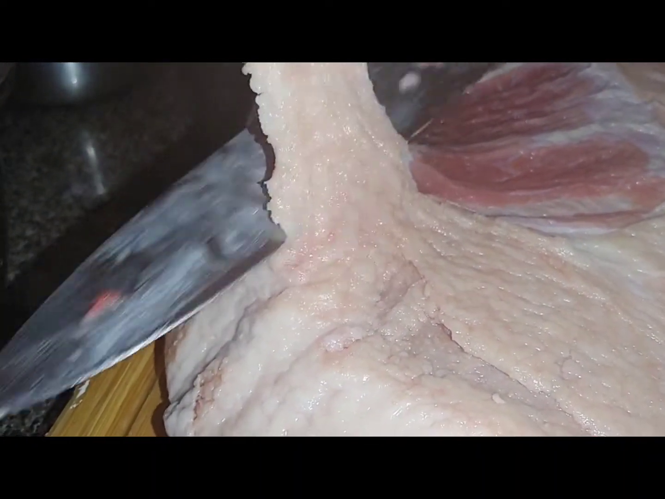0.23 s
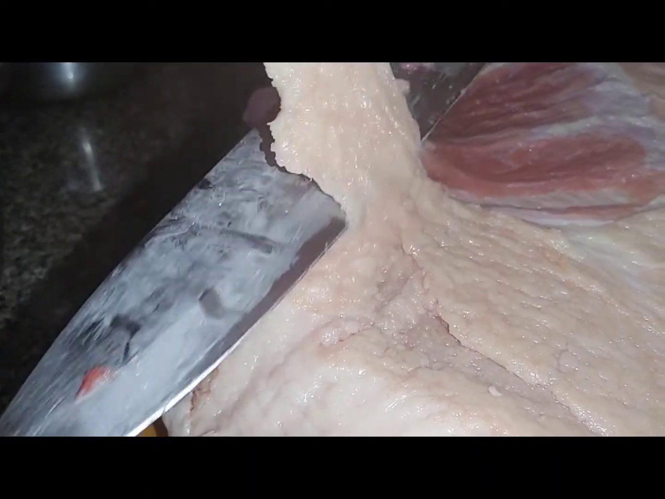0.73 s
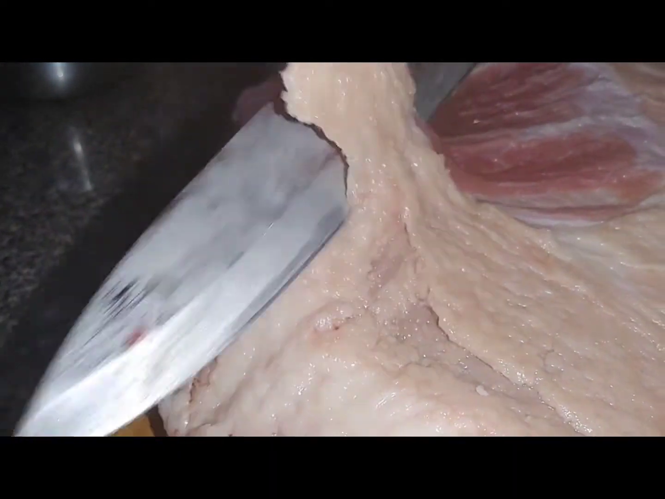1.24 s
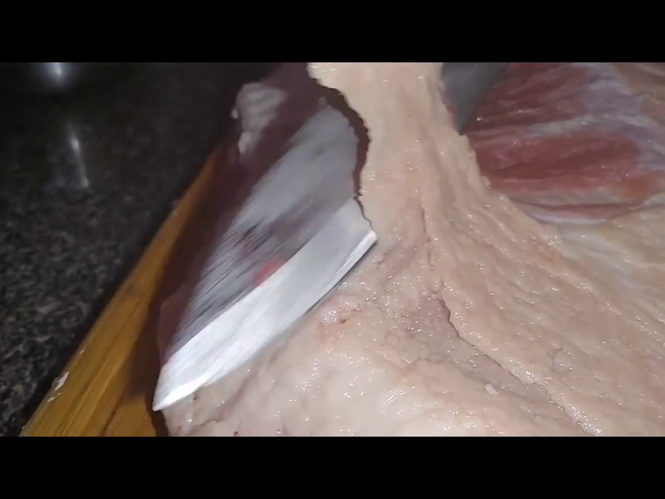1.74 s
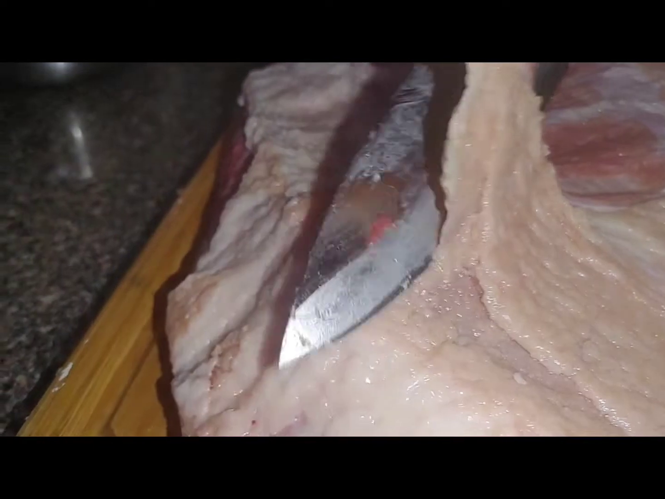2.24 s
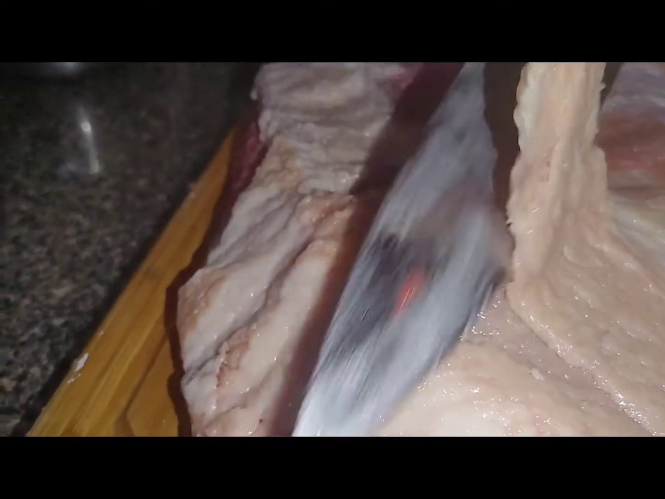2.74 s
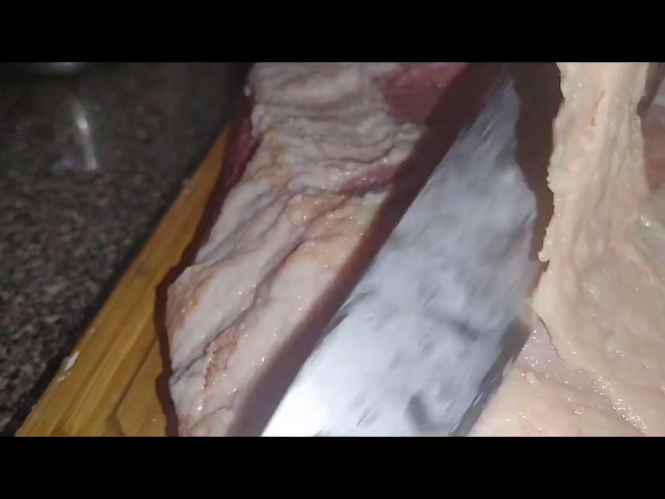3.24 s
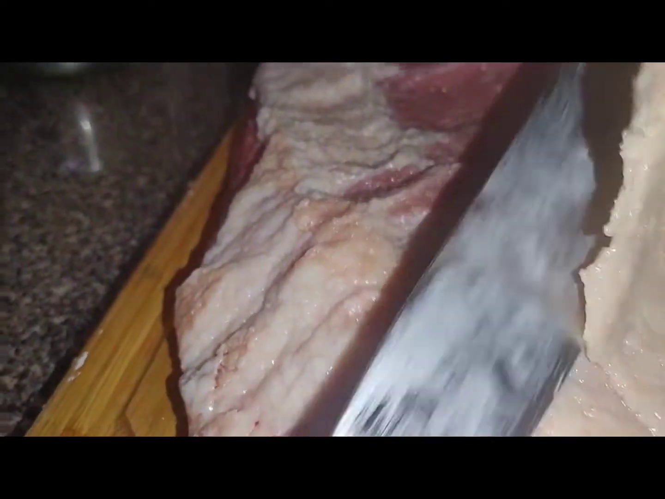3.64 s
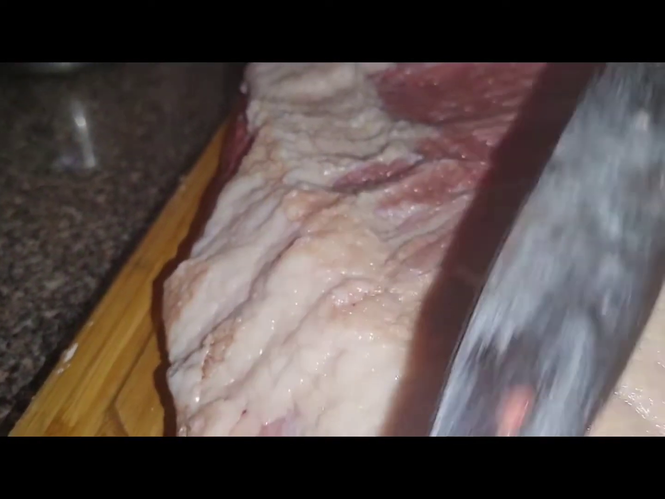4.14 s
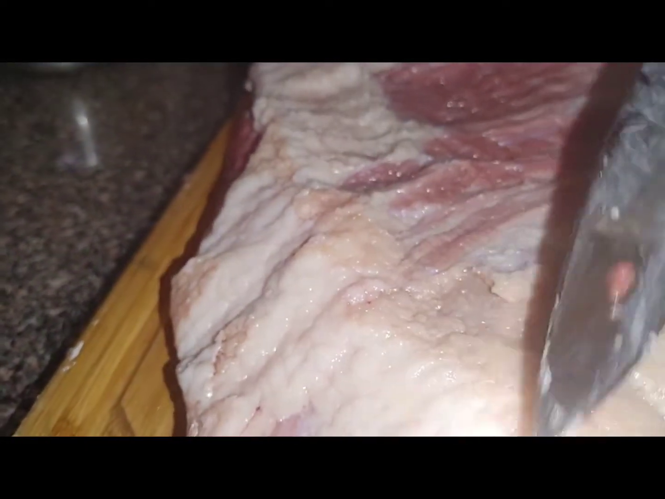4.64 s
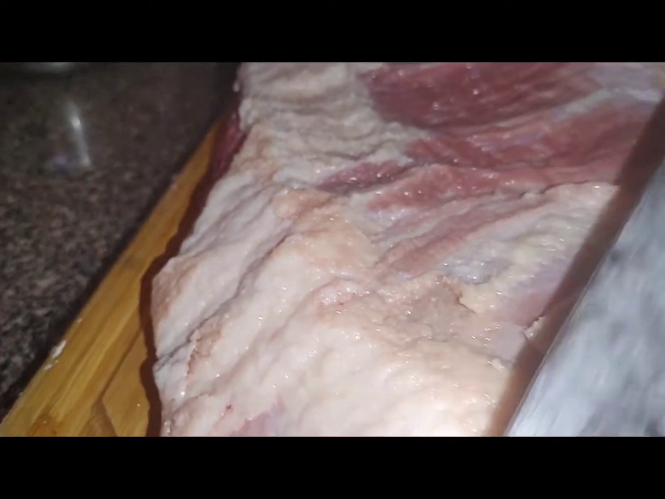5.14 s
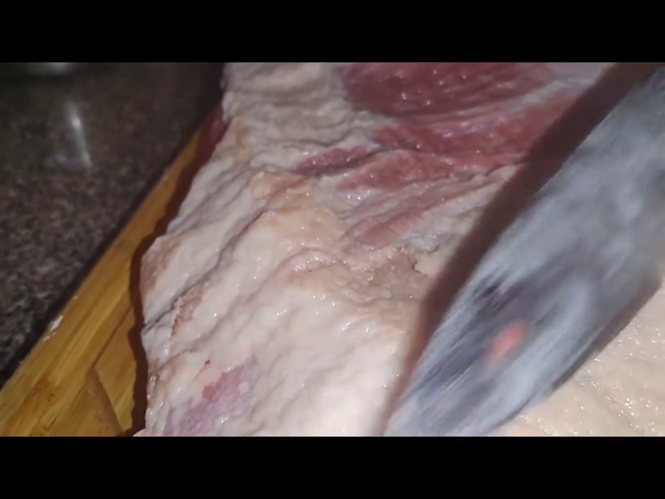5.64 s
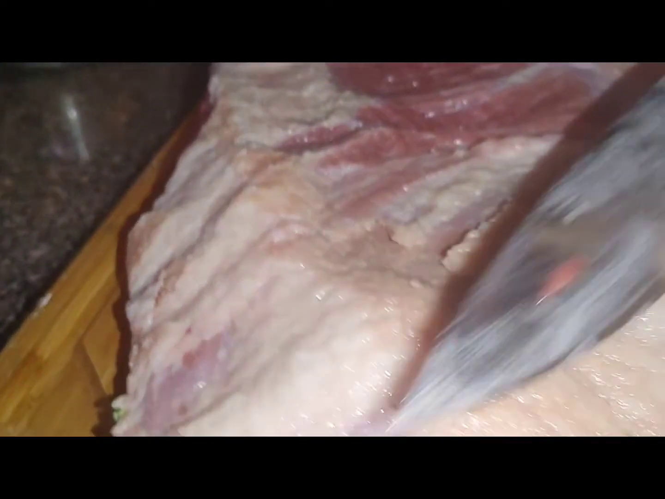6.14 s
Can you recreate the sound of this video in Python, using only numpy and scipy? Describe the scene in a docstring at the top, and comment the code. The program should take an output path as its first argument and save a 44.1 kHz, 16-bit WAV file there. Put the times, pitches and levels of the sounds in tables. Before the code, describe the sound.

A knife saws through raw fatty meat in quick hissing, rasping back-and-forth strokes, with small wet squelches and a low appliance hum behind.

```python
"""Hissing, rasping strokes, about five a second: a chef's knife saws the fat off raw meat on a wooden board.
Tearing fibres and dragging fat are snapping noise through the blade's damped modes, one burst per stroke.
Wet slips ring a pocket under the blade; a short knock and soft bumps are decaying sines of the board.
Behind, in the kitchen, an appliance hums in slightly wavering tones over shaped air noise."""
import sys
import numpy as np
from scipy import signal
from scipy.fft import rfft, irfft, next_fast_len
from scipy.io import wavfile

SR = 44100
rng = np.random.default_rng(int(sys.argv[2]) if len(sys.argv) > 2 else 0)


def unload_wav(signal):
    """Save mono or channel-first audio to the path in sys.argv[1] as 16-bit WAV at rate SR, clipped to [-1, 1]."""
    wavfile.write(
        sys.argv[1],
        SR,
        np.round(np.clip(np.atleast_2d(signal).T, -1, 1) * 32767).astype(np.int16),
    )


N = 281799


def from_db(db):
    """Amplitude ratio of a level in dB."""
    return 10 ** (np.asarray(db) / 20)


def rms_one(x):
    """Scale x to unit rms."""
    return x / np.sqrt(np.mean(x ** 2) + 1e-20)


def at_hz(points, hz, column=1):
    """One table column, interpolated on a log-frequency axis."""
    points = np.array(points)
    return np.interp(np.log(hz + 1e-9), np.log(points[:, 0]), points[:, column])


def filtered(x, response):
    """Pass x through a response given as a function of frequency."""
    size = next_fast_len(N + SR // 2)
    spectrum = rfft(x, size) * response(np.fft.rfftfreq(size, 1 / SR))
    return irfft(spectrum, size)[..., :N]


def resonance(f, hz, width_hz):
    """Damped resonance, gain 1 at its peak."""
    return 1j * f * width_hz / (hz ** 2 - f ** 2 + 1j * f * width_hz)


def drift(rate_hz):
    """Smooth random wander of unit rms: noise through two equal poles at rate_hz."""
    step = 40  # samples per point of the slow signal
    settle = 2000
    pole = np.exp(-2 * np.pi * rate_hz * step / SR)
    noise = rng.standard_normal(N // step + settle + 2)
    slow = signal.lfilter([1], [1, -2 * pole, pole * pole], noise)[settle:]
    return np.interp(np.arange(N) / step, np.arange(len(slow)), rms_one(slow))


def echoes(x, t60_s):
    """Dense decaying reflections, independent per side; each tail has unit energy."""
    t = np.arange(SR // 2) / SR
    tail = rng.standard_normal((2, len(t))) * from_db(-60 * t / t60_s)
    tail /= np.sqrt(np.sum(tail ** 2, axis=1, keepdims=True))
    return signal.fftconvolve(np.atleast_2d(x), tail, axes=1)[:, :N]


def appliance():
    """Slightly wavering motor tones over a soft rush of air, partly shared by the two sides."""
    # slightly wavering tones: (frequency [Hz], nominal rms level [dB])
    hum_tones = [(54, -81), (178, -79), (198.3, -61.5), (247.3, -70.5), (481, -83), (743, -85)]
    # air noise spectrum: (frequency [Hz], relative density [dB])
    air_spectrum = [(25, -40), (55, -19.5), (90, -16.5), (150, -17), (195, 5.5), (230, -1.5), (295, 2.5),
                    (345, -15), (460, -7), (560, -16), (1000, -19.5), (2000, -28), (6000, -35.5),
                    (15000, -50)]
    # left-right likeness of the air noise: (frequency [Hz], correlation [-1 to 1])
    air_likeness = [(50, 0), (130, 0), (290, 0.12), (640, 0), (1400, 0.005)]
    air_rms_db = -61

    def air(sign):
        def response(f):
            correlation = np.clip(at_hz(air_likeness, f), -1, 1)
            return from_db(at_hz(air_spectrum, f)) * np.sqrt(1 + sign * correlation)
        return filtered(rng.standard_normal(N), response)

    mid, side = air(+1), air(-1)
    out = from_db(air_rms_db) * rms_one(np.array([mid + side, mid - side]))
    t = np.arange(N) / SR
    side_phase_rad = np.array([[-.55], [.55]])  # standing waves reach the two sides out of step
    for hz, rms_db in hum_tones:
        level = np.sqrt(2) * from_db(rms_db + 2.1 * drift(rate_hz=3.9))
        phase_rad = 2 * np.pi * hz * t + 0.5 * drift(rate_hz=1.83) + side_phase_rad
        out += level * np.sin(phase_rad)
    return out


def strike(hits, hz, t60_s):
    """Each hit starts one exponentially decaying mode."""
    out = np.zeros(N)
    for start_s, db in hits:
        age_s = np.maximum(np.arange(N) / SR - start_s, 0)
        decay_db = np.minimum(60 * age_s / t60_s, 200)
        out += from_db(db - decay_db) * np.sin(2 * np.pi * hz * age_s)
    return out


def board():
    """A short woody knock on several modes, and dull one-mode bumps cushioned by the meat."""
    # hits of the knock: (time [s], level [dB])
    knock_hits = [(3.446, -54), (3.453, -72), (3.468, -60)]
    # board modes: (frequency [Hz], t60 [s], gain [dB])
    board_modes = [(770, .05, -6), (1080, 0.028, 1), (1166, 0.055, 2)]
    # soft bumps of the meat on the board: (time [s], level [dB])
    bump_hits = [(4.93, -50), (5.859, -54), (5.880, -49), (6.259, -53), (6.33, -55)]
    knock = sum(from_db(db) * strike(knock_hits, hz, t60_s) for hz, t60_s, db in board_modes)
    return knock + strike(bump_hits, hz=268, t60_s=0.16)


def fibres(per_s, spread_db, smooth_share, snap_s=0.0004):
    """Tiny uneven snaps over smooth drag: decaying noise bursts, independent noise per side."""
    snaps = rng.random(N) < per_s / SR
    sizes = from_db(spread_db * np.minimum(rng.exponential(1, N), 4)) * snaps
    energy = signal.lfilter([1], [1, -np.exp(-1 / (snap_s * SR))], sizes ** 2 + 1e-18)
    level = np.sqrt(energy / energy.mean() + smooth_share ** 2)
    return rms_one(level * rng.standard_normal((2, N)))


def squelches():
    """Wet fat slips on the steel: bursts of quick slips ring a pocket between blade and fat."""
    # slip bursts, Gaussian: (centre [s], sigma [s], relative level [dB])
    slip_bursts = [(0.786, 0.0077, -61), (0.812, 0.0087, -55), (4.81, 0.0029, -52.5), (5.005, 0.014, -52),
                   (5.369, 0.0099, -69), (5.728, 0.016, -48.5), (5.755, 0.008, -44.5), (5.806, 0.022, -63),
                   (5.88, 0.0015, -52), (6.103, 0.015, -57), (6.304, 0.0086, -43.5)]
    # pocket resonances: (frequency [Hz], width [Hz], relative gain [dB])
    pocket_modes = [(2336, 72, -0.5), (4400, 160, -0.5), (4220, 72, 7)]

    def pocket(f):
        return sum(from_db(db) * resonance(f, hz, width_hz) for hz, width_hz, db in pocket_modes)

    t = np.arange(N) / SR
    level = sum(from_db(db) * np.exp(-.5 * ((t - centre_s) / sigma_s) ** 2)
                for centre_s, sigma_s, db in slip_bursts)
    slips = fibres(per_s=3100, spread_db=0.0, smooth_share=0.98)
    side_gain = from_db([[-7], [2]])  # left, right
    return filtered(slips * level, pocket) / np.std(filtered(slips, pocket)) * side_gain


def knife_colour(f):
    """Broad friction colour with the blade's meat-damped resonances standing out of it."""
    # friction spectrum: (frequency [Hz], left gain [dB], right gain [dB])
    friction = [(300, -52, -22), (706, -27, -22), (1335, -15.5, -14.5), (1520, -27, -6.5),
                (1820, -19, -10.5), (2470, -26, -3.5), (3310, -5.5, -9.5), (4090, -7.5, 3.5),
                (5030, -1.5, -4), (6040, -11, -9.5), (6880, -7.5, -29), (9500, -10.5, -11),
                (11770, -1.5, -20), (12000, -5.5, -25), (13320, -15.5, -34), (15300, -23.5, -30)]
    # blade modes: (frequency [Hz], width [Hz], left lift [dB], right lift [dB])
    blade_modes = [(2350, 164, 13.5, 1), (2761, 66, 14.5, 4.5), (4890, 45, 2, 9), (6444, 170, 8, 8),
                   (7215, 57, 7.5, 16.5), (7525, 125, 8, 17.5), (8432, 240, 13, 15), (9384, 55, 13.5, 15.5),
                   (10310, 124, 11.5, 0), (11145, 173, 3, 17), (13000, 140, 0, 12), (14300, 170, 3, 4)]
    colour = from_db([at_hz(friction, f, column=1), at_hz(friction, f, column=2)])
    for hz, width_hz, left_db, right_db in blade_modes:
        colour = colour * (1 + (from_db([[left_db], [right_db]]) - 1) * resonance(f, hz, width_hz))
    return colour


def contact_colour(f, fine_db=5.5, sides_db=3.5, broad_db=2.5):
    """Where the meat grips the blade it damps some frequencies and frees others: random ripple."""
    fine_hz = np.arange(0, SR / 2, 110)
    broad_hz = np.geomspace(700, 16000, 10)
    ripple_db = fine_db * rng.standard_normal(len(fine_hz))
    ripple_db = ripple_db + sides_db * rng.standard_normal((2, len(fine_hz)))
    ripple_db += np.interp(fine_hz, broad_hz, broad_db * rng.standard_normal(len(broad_hz)))
    return from_db([np.interp(f, fine_hz, side_db) for side_db in ripple_db])


def balanced(f, shape, band_db, body_hz=900, body_db=-40):
    """Pressure and depth of cut set hiss, rasp and scrape; the meat's dull rubbing has a fixed gain."""
    # hiss, rasp and scrape bands: (low edge [Hz], high edge [Hz])
    band_edges = [(6000, 15500), (3000, 6000), (1100, 3000)]
    power = np.mean(np.abs(shape) ** 2, axis=0)
    natural_db = [10 * np.log10(np.mean(power * (f > low) * (f < high))) for low, high in band_edges]
    lift_db = np.subtract(band_db, natural_db)[::-1]  # lowest band first
    # flat gain inside each band, sloping between bands
    plateau_hz = np.sort(np.ravel(np.array(band_edges) * [1.12, 1 / 1.12]))
    gain_db = np.interp(f, [body_hz, *plateau_hz], [body_db, *np.repeat(lift_db, 2)])
    return shape * from_db(gain_db)


def stroke_level(age_s, start_s, length_s, swell_db):
    """The edge bites, speed follows a half sine while the hand bears down or eases, the edge lets go."""
    # the bite softens as the flap of fat comes loose
    attack_s = 0.035 + 0.0038 * start_s
    release_s = 0.044
    # friction is louder at full speed than at the turns, more so as the cut deepens
    speed_db = 10.5 + 1.14 * start_s
    travel = np.clip(age_s / length_s, 0, 1)
    attack = np.clip(age_s / attack_s, 0, 1) ** 2
    release = np.clip((length_s - age_s) / release_s, 0, 1) ** 2
    speed = np.sin(np.pi * travel)
    return attack * release * from_db(speed_db * (speed - 1) + swell_db * (travel - .5))


def stroke_bands(time_s, hiss_db, is_push):
    """Hiss, rasp and scrape levels at time_s; a push bears down harder than a pull and scrapes more."""
    # coarseness as the cut proceeds: (time [s], rasp re hiss [dB], pull scrape re hiss [dB])
    coarseness = [(0, -14, -18.5), (0.8, -14, -19.5), (1.2, -5.5, -14), (1.65, -9.5, -16.5),
                  (3.9, -10, -14.5), (4.35, -5.5, -16), (5.4, -7, -14), (5.65, -2, -9), (6.35, -7, -10)]
    push_scrape_db = 2.0
    times_s, *columns = np.transpose(coarseness)
    rasp_db, scrape_db = (np.interp(time_s, times_s, column) for column in columns)
    return hiss_db + np.array([0, rasp_db, scrape_db + push_scrape_db * is_push])


def slicing(spots=4):
    """Fibre noise driven by each stroke's speed; its grip flutters and shifts along the blade."""
    # pulls and pushes in turn: (start [s], end [s], relative hiss level [dB], start-to-end swell [dB])
    strokes = [(0, 0.191, -49.5, -14.5), (0.209, 0.429, -45.5, 4), (0.465, 0.648, -49.0, -5),
               (0.662, 0.887, -44.0, -2), (0.91, 1.082, -53, -2), (1.112, 1.291, -53, -1),
               (1.331, 1.525, -49.5, 7), (1.539, 1.747, -46, -3.5), (1.758, 1.969, -46, -9),
               (1.959, 2.166, -44, -2.5), (2.177, 2.384, -47.5, -15), (2.39, 2.592, -44, 5),
               (2.589, 2.801, -47.0, 0), (2.797, 3.006, -44, 1), (3.012, 3.219, -48.0, -9.5),
               (3.204, 3.414, -43.5, -7.5), (3.4, 3.625, -44.0, 1), (3.615, 3.832, -39.5, 1.5),
               (3.809, 4.022, -46.0, 6.5), (4.008, 4.242, -42.5, -10.5), (4.223, 4.431, -58.5, -36),
               (4.417, 4.596, -54.5, 1), (4.596, 4.785, -44.5, 11), (4.777, 4.982, -42.5, -2.5),
               (4.972, 5.154, -42.5, 2), (5.132, 5.355, -40.5, 2.5), (5.329, 5.526, -47.0, -6),
               (5.515, 5.718, -44.5, -5), (5.695, 5.882, -48.5, 2), (5.861, 6.072, -46, 1),
               (6.054, 6.237, -45.0, 16), (6.226, 6.421, -39, -3)]
    size, lead = 16384, 1024  # samples per stroke block, and ahead of its start
    f = np.fft.rfftfreq(size, 1 / SR)
    age_s = (np.arange(size) - lead) / SR
    colour = knife_colour(f)
    grip_db = 0.61 * drift(rate_hz=22) + 0.28 * drift(rate_hz=220)
    tearing = fibres(per_s=4500, spread_db=2.0, smooth_share=0.75) * from_db(grip_db)
    tearing = np.pad(tearing, ((0, 0), (lead, size)))
    out = np.zeros_like(tearing)
    for k, (start_s, end_s, hiss_db, swell_db) in enumerate(strokes):
        first = round(start_s * SR)
        block = slice(first, first + size)
        length_s = end_s - start_s
        travel = np.clip(age_s / length_s, 0, 1)
        drive = tearing[:, block] * stroke_level(age_s, start_s, length_s, swell_db)
        band_db = stroke_bands((start_s + end_s) / 2, hiss_db, is_push=k % 2)
        # contact crossfades through spots on the blade, each with its own colour
        for spot in range(spots):
            share = np.maximum(1 - abs(travel * (spots - 1) - spot), 0)
            shape = balanced(f, colour * contact_colour(f), band_db)
            out[:, block] += irfft(rfft(drive * share) * shape)
    return from_db(1.05) * out[:, lead:lead + N]


def scene():
    """Close knife work, a little kitchen reverberation, the hum behind."""
    work = slicing() + squelches() + board()
    return work + from_db(-11.5) * echoes(work, t60_s=0.15) + appliance()


def record(dry):
    """Steep elliptic low-pass at 15.5 kHz."""
    return signal.sosfilt(signal.ellip(10, .1, 80, 15500, fs=SR, output="sos"), dry)


dry = scene()
out = record(dry)
unload_wav(out)
```